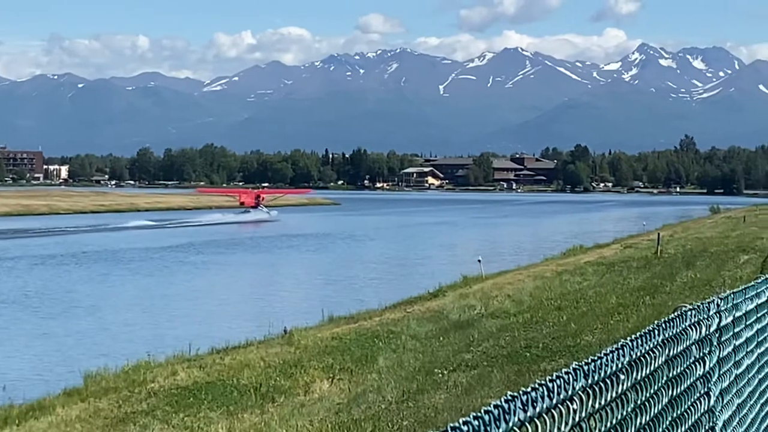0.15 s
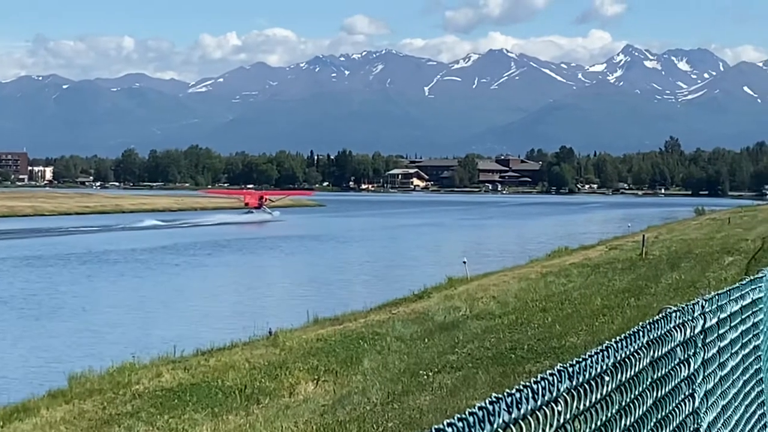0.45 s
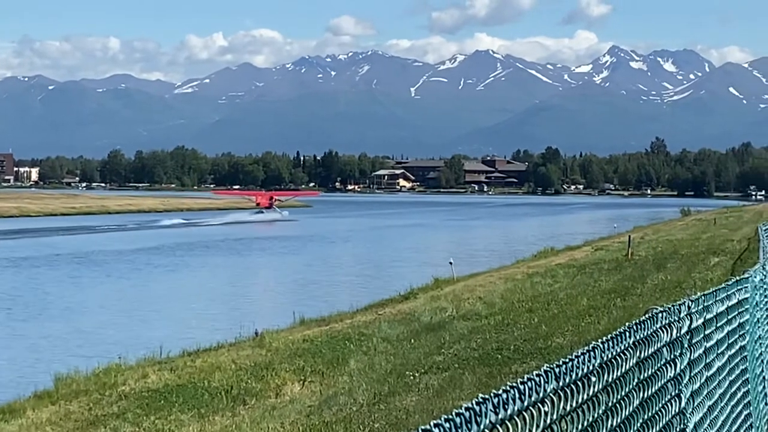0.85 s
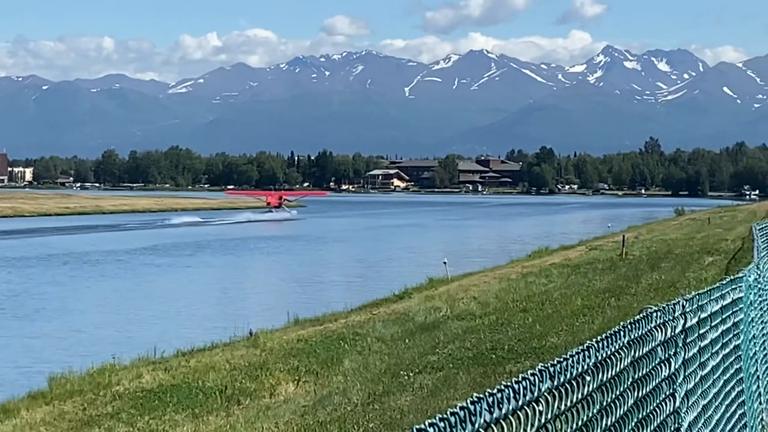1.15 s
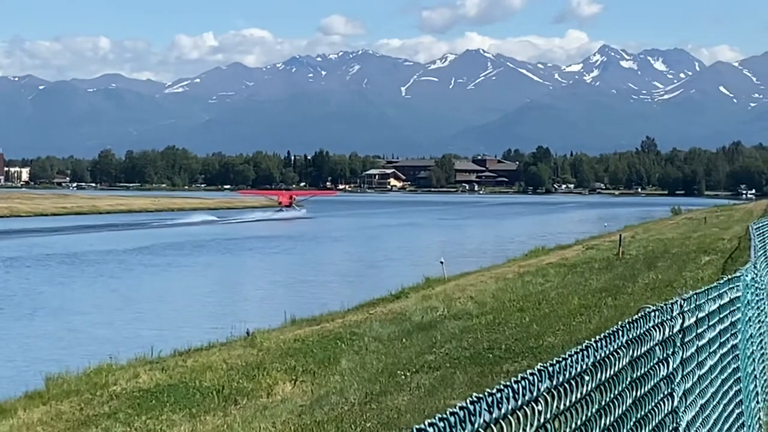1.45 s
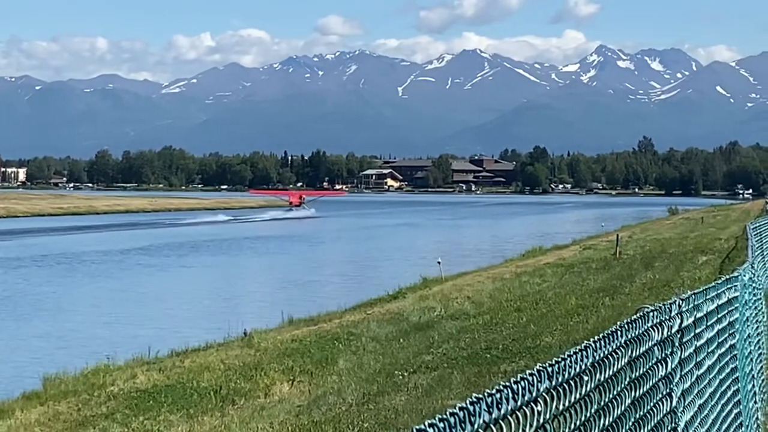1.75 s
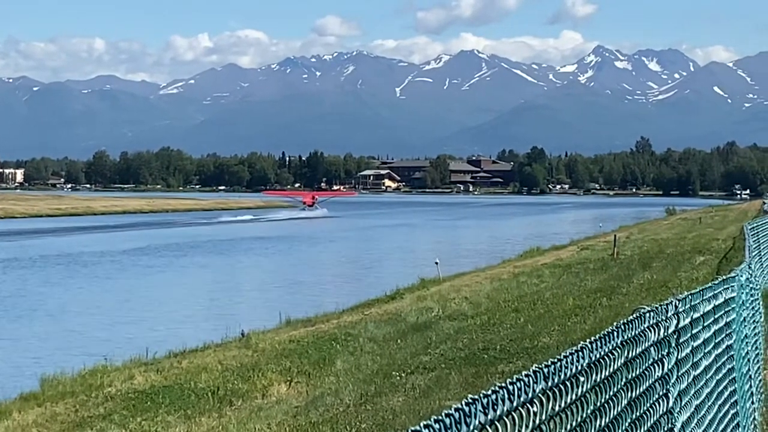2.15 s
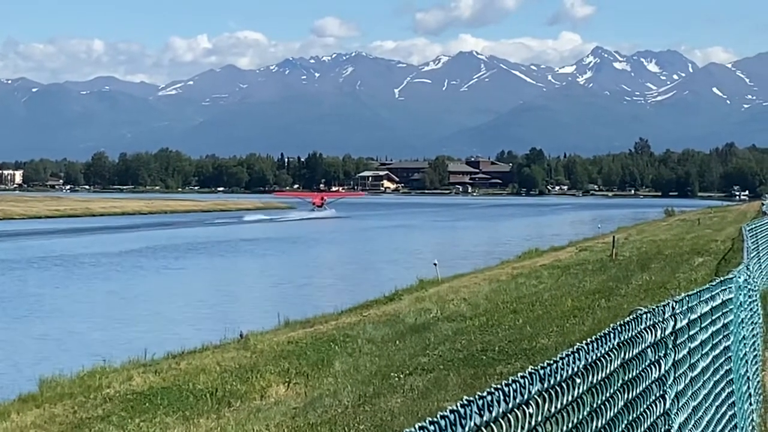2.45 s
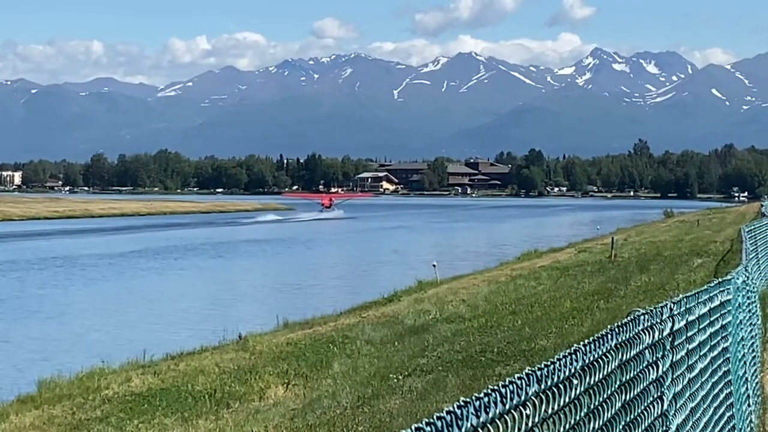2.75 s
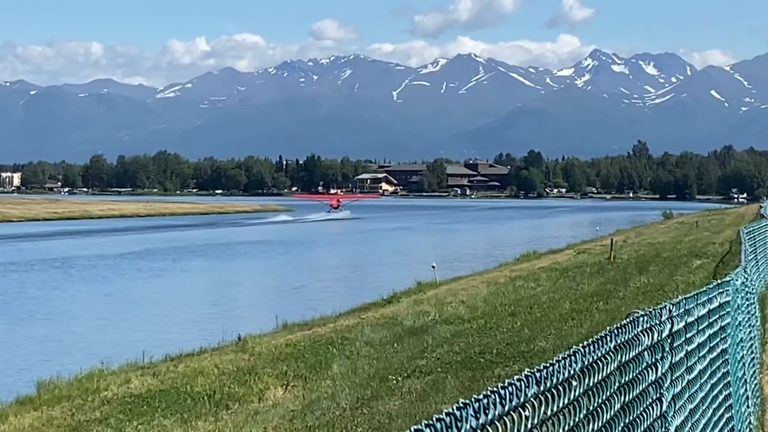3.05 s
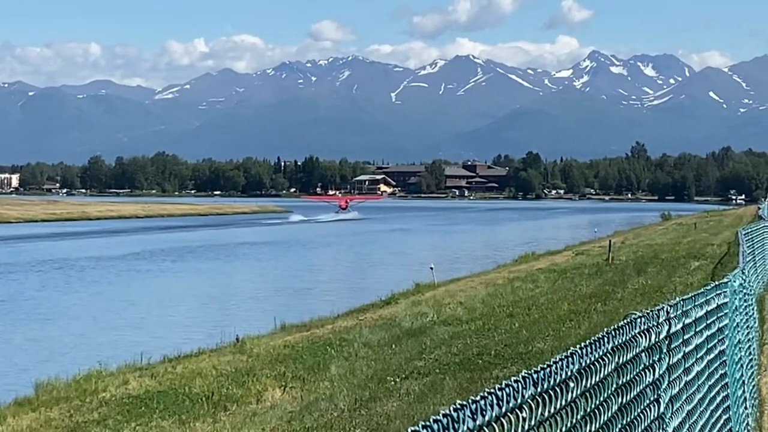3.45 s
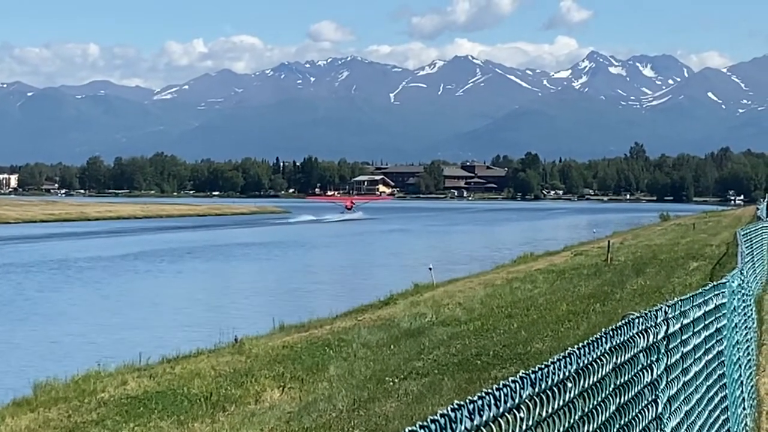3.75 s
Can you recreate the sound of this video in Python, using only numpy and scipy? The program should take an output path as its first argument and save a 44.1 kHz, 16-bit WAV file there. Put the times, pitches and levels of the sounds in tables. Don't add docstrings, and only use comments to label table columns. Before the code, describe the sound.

A small float plane's throaty engine drones loudly across a lake, then moves away, lowering in pitch and growing duller; soft water wash, wind bumps on the outdoor stereo microphone and faint bird calls sit underneath.

```python
import sys
import numpy as np
from scipy import signal
from scipy.fft import rfft, irfft, next_fast_len
from scipy.io import wavfile
from scipy.ndimage import uniform_filter1d, map_coordinates

SR = 44100
rng = np.random.default_rng(int(sys.argv[2]) if len(sys.argv) > 2 else 0)


def rack_gain(trim_db):
    fader = np.asarray(trim_db, float)
    return 10 ** (fader / 20)


def unload_audio(sound):
    columns = np.transpose(np.atleast_2d(sound))
    steps = np.round(np.clip(columns, -1, 1) * 32767)
    wavfile.write(sys.argv[1], SR, steps.astype(np.int16))


N = 172431


def unit(x):
    return x / np.sqrt(np.mean(x ** 2) + 1e-20)


def along(points, hz):
    f, v = np.transpose(points)
    return np.interp(np.log(hz + 1), np.log(f + 1), v)


def curves(rows):
    s, *cols = np.transpose(rows)
    return [np.interp(np.arange(N) / SR, s, c) for c in cols]


def wobble(rate):
    return map_coordinates(rng.standard_normal(400), [np.arange(N) * rate / SR])


def filtered(x, response):
    edge = SR // 8
    m = next_fast_len(N + 4 * edge)
    wide = np.pad(x, [(0, 0)] * (np.ndim(x) - 1) + [(edge, edge)], "reflect")
    return irfft(rfft(wide, m) * response(np.fft.rfftfreq(m, 1 / SR)), m)[..., edge:edge + N]


# frequency in Hz, side relative to mid in dB.
WIDTH = [(100, -21), (260, -13.5), (350, -9.5), (700, -10), (1000, -11.5), (1450, 0), (2050, -13),
         (2500, -26), (4000, -51), (7200, -50), (7700, -16.5)]


def rush(spectrum, patchy_db, loss_db=np.zeros(N)):
    air_hz, air_power = 4800, 0.84
    hz, s, z = signal.stft(rng.standard_normal((2, N)), SR, nperseg=512)
    field = uniform_filter1d(rng.standard_normal(z.shape[1:]), size=5, axis=0)
    field = uniform_filter1d(field, size=14, axis=1)
    z = z * rack_gain(patchy_db * unit(field))
    frame_loss = loss_db[np.minimum((s * SR).astype(int), N - 1)]
    loss = frame_loss * (hz[:, None] / air_hz) ** air_power

    def shape(f):
        return rack_gain(along(spectrum, f)) * [f * 0 + 1, rack_gain(along(WIDTH, f))]

    clear, dull = [filtered(signal.istft(v, nperseg=512)[1][:, :N], shape) for v in (z, z * rack_gain(loss))]
    mid, side = dull / np.std(clear[0])
    return np.array([mid + side, mid - side])


# time in seconds, cycles a second in Hz.
CYCLE = [(0.0, 15.61), (0.3, 15.44), (0.6, 15.33), (0.9, 15.29), (1.2, 15.19), (1.45, 15.03), (1.7, 14.82),
         (1.95, 14.65), (2.2, 14.53), (2.45, 14.43), (2.7, 14.24), (2.95, 13.95), (3.2, 13.72),
         (3.45, 13.42), (3.7, 13.27), (3.9, 13.11)]
# time in seconds, level in dB, bark in dB.
ENGINE = [(0, -30, -4.5), (.5, -32.5, -1), (.9, -33.5, 0), (1.2, -33, .5), (1.5, -32, -5), (1.7, -34, -4),
          (2.2, -33.5, -5.5), (2.7, -35.5, -4), (3.2, -37.5, -2), (3.91, -39, -0.5)]
# multiple of the cycle, level in dB, drift in dB a second as the pipe turns away.
EXHAUST = [(3, -25, -1), (4, 0, -.3), (5, -11, .5), (6, -21, .5), (7, -9.5, 0), (8, 0, 0), (9, -14, .3),
           (10, -18, 0), (11, -13, .3), (12, -7.5, .3), (13, -18, -1.5), (14, -30, 0), (15, -26, 1),
           (16, -20, 0), (17, -21, -2.5), (18, -27, -1.5), (19, -23, .7), (20, -31, 3.5), (21, -34, 0),
           (23, -28.5, 0), (24, -22, -3), (25, -31.5, 0), (27, -25, -1), (28, -19, -4.5), (30, -29.5, 0),
           (36, -32, -4), (40, -24, -5)]
BARKING = {11: .4, 12: 1, 13: .4}


def exhaust(turn):
    t = np.arange(N) / SR
    (level_db, bark_db), pipe_order = curves(ENGINE), 12
    start_turn, pulse_turn = 1.2, 2.6
    shaken_turn = turn + 0.01 * wobble(9) + start_turn
    tone = 0
    for k, db, drift in EXHAUST:
        size = rack_gain(db + drift * t + 1.1 * wobble(6) + BARKING.get(k, 0) * bark_db)
        scatter = (0.2 + 0.09 * max(k - pipe_order, 0)) * rng.normal()
        reversal = np.pi / 2 * (1 + np.sign(k - pipe_order))
        tone = tone + size * np.cos(k * shaken_turn + pulse_turn + reversal + scatter)
    return np.sqrt(2) * rack_gain(level_db) * tone


# time in seconds, strength in dB, brightness in dB.
ROAR = [(0, -53, -6), (.3, -52.5, -9.5), (.6, -55, -8.5), (.9, -55.5, -12), (1.2, -56.5, -15.5),
        (1.5, -57.5, -16.5), (1.8, -59, -18.5), (2.1, -62, -16), (2.4, -57, -22.5), (2.7, -67, -16.5),
        (3, -69, -14.5), (3.3, -65, -20), (3.6, -67.5, -17.5), (3.91, -68.5, -14)]
# frequency in Hz, density in dB per Hz.
ROAR_COLOUR = [(290, -40), (500, -8.5), (631, -3), (796, -10), (906, -3), (3390, -14.5), (6390, -26.5),
               (11000, -48.5), (14300, -82), (22000, -120)]


def roar(turn):
    strength_db, bright_db = curves(ROAR)
    noise = rush(ROAR_COLOUR, patchy_db=2.0, loss_db=bright_db - bright_db[SR // 4])
    return rack_gain(strength_db + 4.5) * noise * (1 + 0.17 * np.sin(4 * turn))


def plane():
    turn = 2 * np.pi * np.cumsum(curves(CYCLE)[0]) / SR
    return exhaust(turn) + roar(turn)


# time in seconds, level in dB.
WASH = [(0.05, -47), (0.07, -47.5), (1.03, -46), (1.11, -45), (1.12, -48.5), (1.18, -45), (1.59, -47),
        (1.88, -44.5), (2.0, -47), (2.84, -47), (3.37, -50.5), (3.88, -48.5)]
# frequency in Hz, density in dB per Hz.
LAKE = [(100, -22), (200, -1.5), (320, -2), (450, -3), (800, -7), (1300, -21.5), (2500, -28), (5000, -60.5)]


def wash():
    return rack_gain(curves(WASH)[0] + 1 + 0.72 * wobble(3.6)) * rush(LAKE, patchy_db=0.4)


# centre in seconds, length in seconds, frequency in Hz, level in dB.
SWELLS = [(.15, 0.54, 925, -52.5), (.68, 0.32, 435.5, -46), (1.2, 0.064, 297, -52), (1.85, 0.094, 432, -44),
          (1.945, 0.17, 3300, -77), (2.322, .012, 1220, -55), (2.405, 0.16, 565, -52.5),
          (2.385, .06, 60, -37.5), (2.45, 0.19, 2244, -67), (2.527, .12, 4630, -83.5),
          (2.469, .008, 2470, -59.5), (2.595, 0.22, 964, -56), (2.802, 0.067, 403, -51),
          (3.199, 0.096, 2095, -75), (2.726, 0.11, 61.6, -32.5), (3.5, .06, 284, -51.5),
          (3.806, 0.16, 640, -62), (3.86, 0.22, 473, -55)]


def swells():
    t, out = np.arange(N) / SR, np.zeros(N)
    for s, length, hz, db in SWELLS:
        band = filtered(rng.standard_normal(N), lambda f: np.exp(-((f / hz - 1) / 0.11) ** 2))
        out += rack_gain(db) * np.exp(-((t - s) / length) ** 2) * unit(band)
    return out


# time in seconds, frequency in Hz.
DRONE_HZ = [(0, 99.4), (.6, 99.4), (1.2, 98.7), (2, 97.5), (2.6, 97.3), (3.91, 96.7)]
# time in seconds, level in dB.
DRONE = [(0, -27), (.5, -28.5), (.75, -29), (1, -33.5), (1.3, -35.5), (1.6, -46), (2, -42), (2.5, -50.5),
         (2.8, -29.5), (2.95, -47), (3.2, -52), (3.4, -41), (3.55, -33.5), (3.7, -37.5), (3.91, -38.5)]


def far_engine():
    (hz,), (level_db,) = curves(DRONE_HZ), curves(DRONE)
    turn = 2 * np.pi * np.cumsum(hz) / SR + 0.13 * wobble(8.3)
    size = np.sqrt(2) * rack_gain(level_db - 0.5 * wobble(9.4))
    second = rack_gain(-26.5) * np.sin(2 * turn)
    return size * np.array([np.cos(turn + lag) + second for lag in (.12, -.12)])


# start in seconds, length in seconds, end frequency in Hz, level in dB.
WHISTLES = [
    (.725, .045, 7100, -77),
    (.965, .025, 5750, -77),
    (1.165, .045, 6600, -72),
    (1.968, .058, 6800, -78),
    (2.058, .049, 7050, -80),
]


def whistles():
    drop_hz, drop_s = 950, .013
    t, out = np.arange(N) / SR, np.zeros(N)
    for s, length, hz, db in WHISTLES:
        u = np.clip((t - s) / length, 0, 1)
        cycles = hz * t - drop_hz * drop_s * np.exp(-np.maximum(t - s, 0) / drop_s)
        envelope = np.sin(np.pi * u ** 1.1) ** 0.86 * (u < 1)
        out += rack_gain(db + 3 * wobble(90)) * envelope * np.sin(2 * np.pi * cycles)
    return out


CLICK_DB = [-14, -4, 0, -3]


def trill():
    start_s, syllable_s, click_gap_s, click_s = 2.139, .0166, .0041, .0016
    t, out = np.arange(N) / SR, np.zeros(N)
    for k in range(5):
        for j, db in enumerate(CLICK_DB):
            u = t - start_s - k * syllable_s - j * click_gap_s
            hz = 4400 - k * 35 + (j - 2) * 110
            size = rack_gain(-56.5 + db + 1.5 * rng.normal() - abs(k - 2))
            out += size * np.exp(-(u / click_s) ** 2) * np.sin(2 * np.pi * hz * u)
    return out


# centre in seconds, peak in dB, sign of push or pull, left-right difference in dB.
BUMPS = [(.145, -19, -1, -30.5), (0.322, -21.5, 1, -30), (0.351, -23, -1, -34.5), (0.663, -21, 1, -44.5),
         (0.806, -16.5, -1, -33), (0.865, -29.5, 1, -42), (1.451, -20.5, -1, -26), (1.5, -15.5, -1, -37),
         (1.541, -27, 1, -38.5), (1.894, -32, -1, -42), (2.089, -27, -1, -35), (2.163, -23.5, -1, -44),
         (2.473, -30, -1, -26), (3.46, -34, 1, -32.5), (3.868, -21.5, -1, -48.5)]
# frequency in Hz, density in dB per Hz.
BUMP_COLOUR = [(15, -29), (30, -10), (45, 0.5), (62, 8.5), (78, 4), (110, -4), (180, -9.5), (400, -48),
               (1500, -120)]


def wind():
    bump_hz, bump_s, wake_s, low_cut_hz = 62, .013, .035, 33
    t = np.arange(N) / SR
    mid, side = unit(filtered(rng.standard_normal((2, N)), lambda hz: rack_gain(along(BUMP_COLOUR, hz))))
    size = rack_gain(-36.5 + 2.5 * wobble(8.4) - 0.39 * t)
    for s, db, *_ in BUMPS:
        size = size + rack_gain(db - 21) * np.exp(-((t - s) / wake_s) ** 2)
    mid, side = size * mid, size * rack_gain(-18) * side
    for s, db, sign, side_db in BUMPS:
        push = np.sign(sign) * np.exp(-((t - s) / bump_s) ** 2) * np.cos(2 * np.pi * bump_hz * (t - s))
        mid, side = mid + rack_gain(db) * push, side + rack_gain(side_db - 9.5) * push
    return filtered(np.array([mid + side, mid - side]), lambda hz: 1 / (1 + (low_cut_hz / (hz + 1)) ** 4))


# frequency in Hz, density in dB per Hz.
HISS = [(2000, -31.5), (4000, -15), (5500, -8), (8000, 1), (11000, -6), (12200, -4.5), (12500, -44)]


def hiss():
    return rack_gain(-97.5) * rush(HISS, patchy_db=-2.3)


# frequency in Hz, lead of the left in radians.
LEAD = [(60, .03), (130, .1), (260, .02), (500, -.7), (950, -.6), (1400, 0), (1750, .4), (2400, 0),
        (7100, 0), (9000, -3.1), (11000, -6.28)]
# frequency in Hz, left over right in dB.
TILT = [(40, -0.3), (180, .5), (350, 1.7), (700, -1.9), (1400, 2), (2800, 1.06), (5600, 0)]


def between_ports(air):
    sides = np.array([[1], [-1]])

    def response(hz):
        return rack_gain(sides * along(TILT, hz) / 2) * np.exp(.5j * sides * along(LEAD, hz))

    return filtered(air, response)


def scene():
    air = between_ports(plane() + wash() + swells() + hiss())
    return air + far_engine() + whistles() + trill() + wind()


def clock_whine(mid):
    bass = filtered(mid, lambda hz: (hz > 80) & (hz < 200))
    return rack_gain(-66) * bass * np.cos(2 * np.pi * 12000 * np.arange(N) / SR)


def band_limit(x):
    return signal.sosfilt(signal.butter(12, 13070, fs=SR, output="sos"), x)


def record(dry):
    mid = dry.mean(axis=0)
    notched = filtered(mid, lambda hz: ((hz < 8780) | (hz > 9260)) & (hz < 12420))
    heard = dry - mid + notched + clock_whine(mid)
    fade = np.minimum(np.arange(N)[::-1] / SR / .004, 1)
    return band_limit(heard * fade)


dry = scene()
out = record(dry)
unload_audio(out)
```